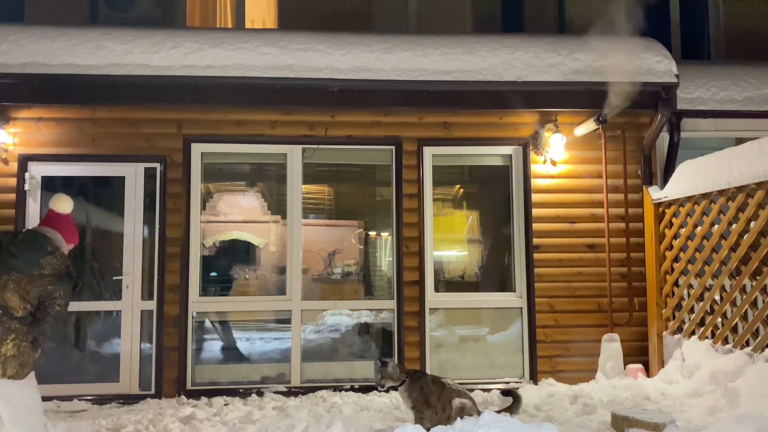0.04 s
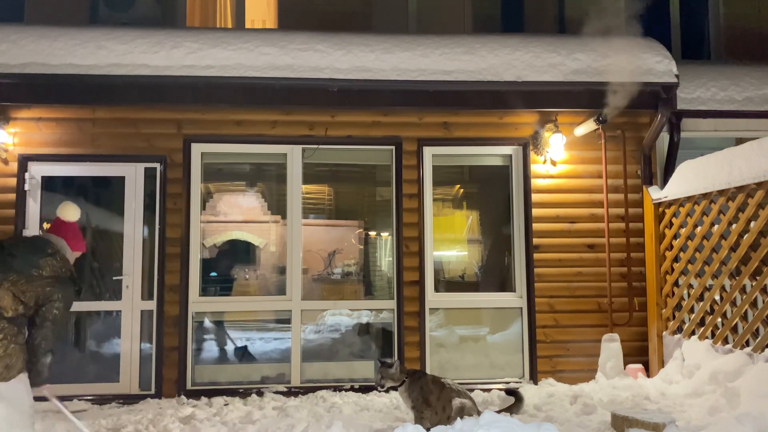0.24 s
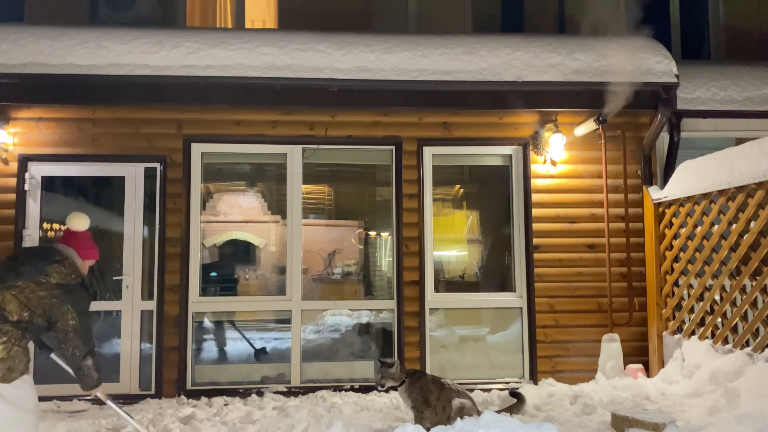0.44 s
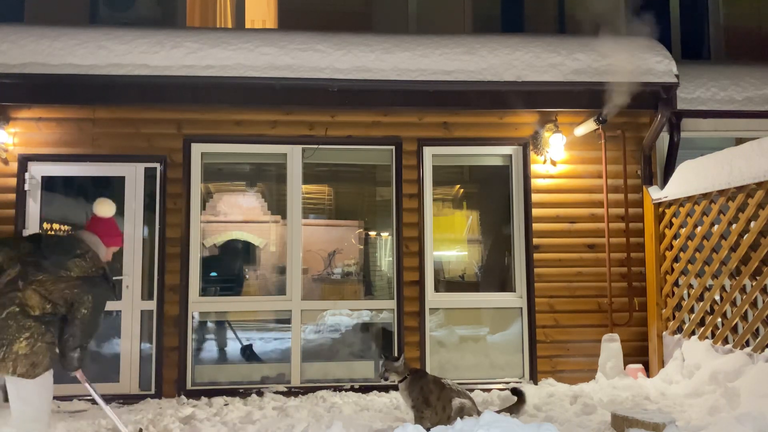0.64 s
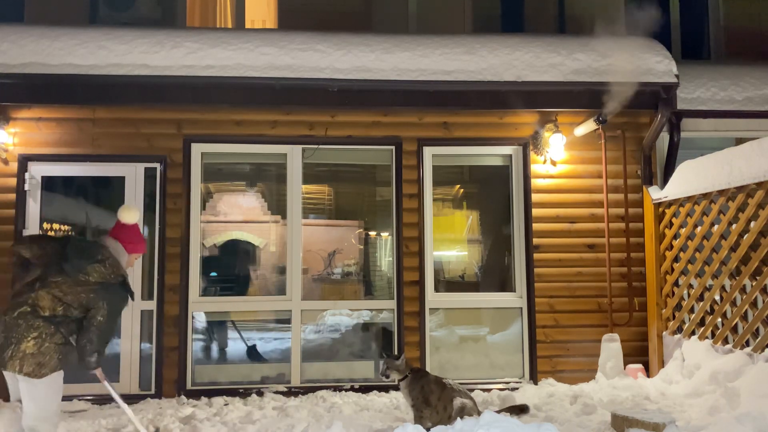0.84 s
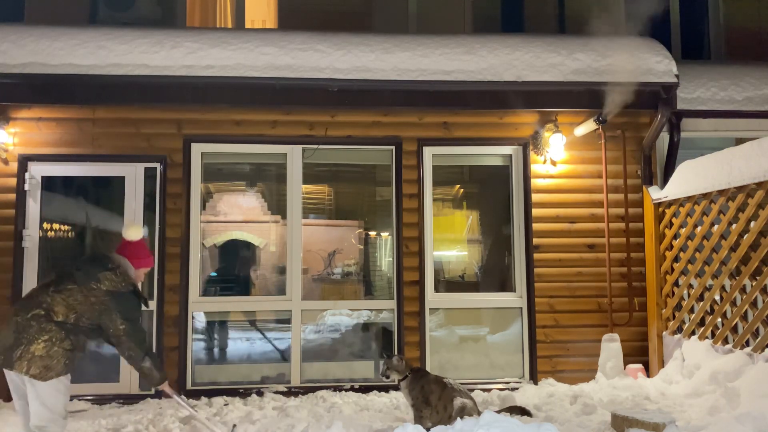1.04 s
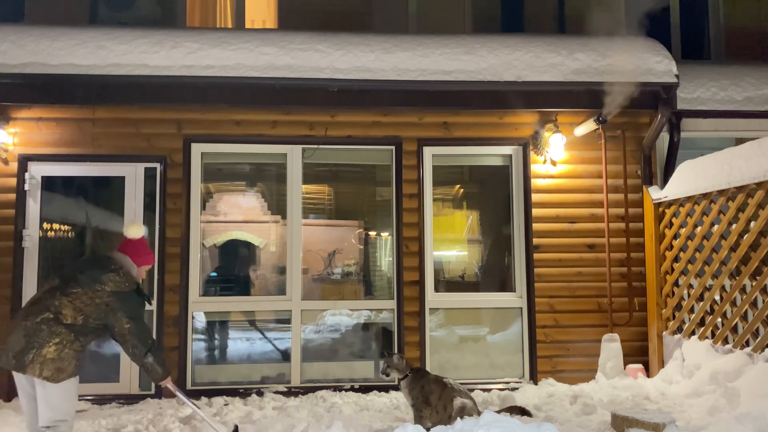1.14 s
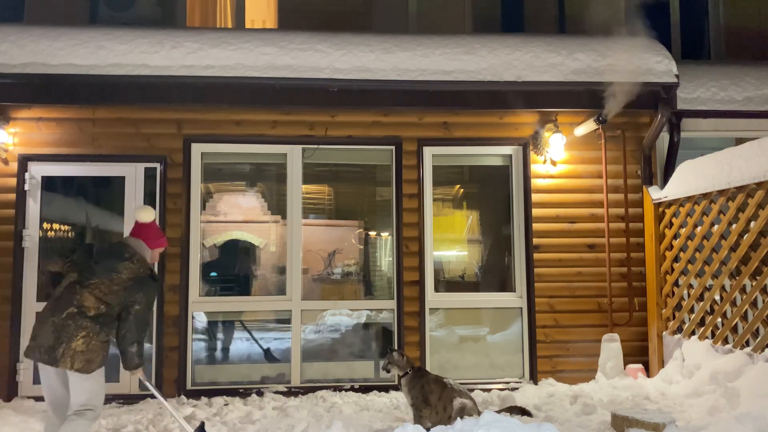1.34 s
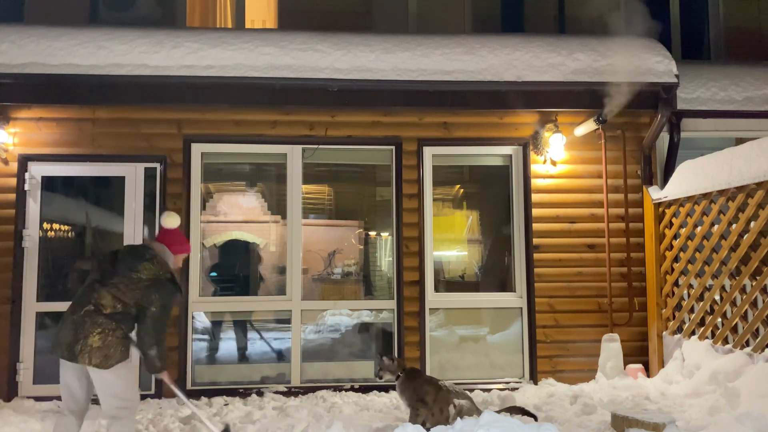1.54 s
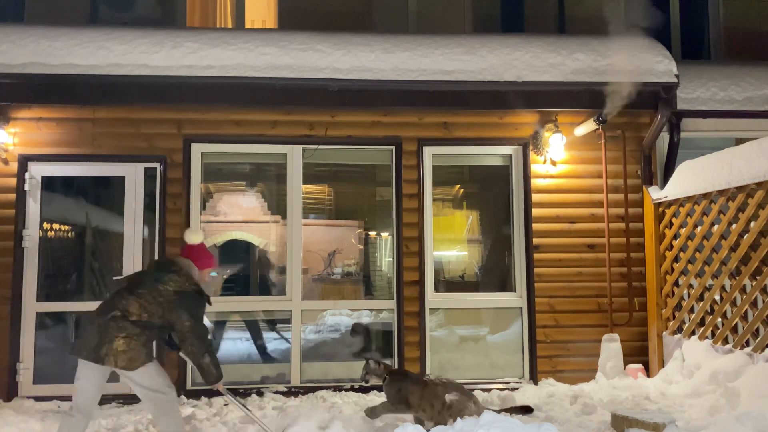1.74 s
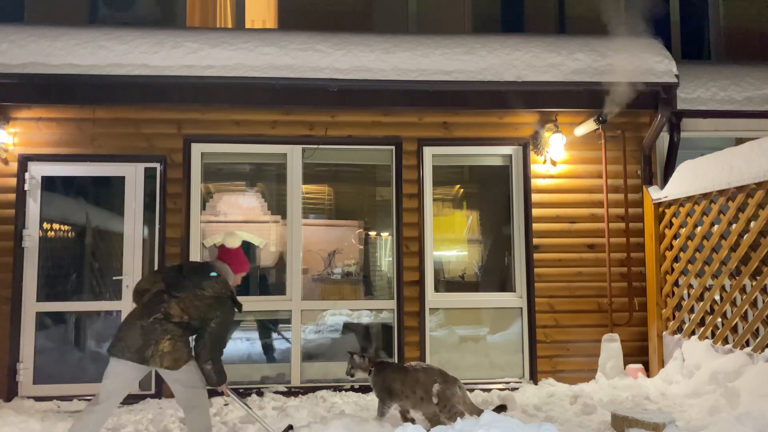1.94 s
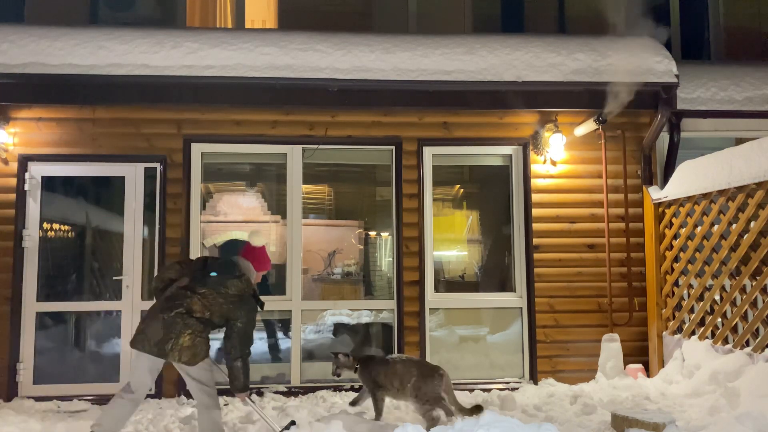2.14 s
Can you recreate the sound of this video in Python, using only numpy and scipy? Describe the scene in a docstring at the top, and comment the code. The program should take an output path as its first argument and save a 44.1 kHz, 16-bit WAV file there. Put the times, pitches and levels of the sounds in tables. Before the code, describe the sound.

Snow shovel scraping through packed snow in three rough, hissing strokes on a still night

```python
"""Three hissing scrapes of a shovel through packed snow on a still night, a few metres away by a wooden house.
Breaking grains are clumped random impulses, coloured into hiss, crunch and a drone through the blade's modes.
Lumps thud as short damped sines; catches of the edge are decaying noise bursts that ring the blade;
the scrape dips just before two of them. Two microphone ports hear the shovel with a lag, and wall and
snow banks answer with scattered, decaying noise. A faint noise floor is the night."""
import sys
import numpy as np
from scipy import signal
from scipy.fft import rfft, irfft, next_fast_len
from scipy.io import wavfile
from scipy.ndimage import map_coordinates

SR = 44100
rng = np.random.default_rng(int(sys.argv[2]) if len(sys.argv) > 2 else 0)


def master(y):
    """Save y as 16-bit WAV."""
    cut = np.clip(np.atleast_2d(y).T, -1, 1)
    pcm = np.round(cut * 32767)  # scale
    wavfile.write(sys.argv[1], SR, pcm.astype(np.int16))


N = 97020

# Modes of the blade: (frequency [Hz], relative level [dB], t60 [s])
BLADE_MODES = [(252, -6, 0.26), (344, 3, 0.057), (487, -4, 0.094), (656.3, -10, 0.16), (768.4, 2.5, 0.19),
               (888, 1.5, 0.2), (1005, 0, 0.23), (1089, -2, 0.13), (1513, -16, 0.068), (1947, -5, 0.094)]


def amp(db):
    """Level in decibels to amplitude ratio."""
    return 10 ** (np.asarray(db) / 20)


def unit(x):
    """Normalisation to unit root-mean-square."""
    return x / np.sqrt(np.mean(x ** 2) + 1e-20)


def along(points, hz, ends=None):
    """Interpolation of (frequency [Hz], value) points on a logarithmic frequency axis."""
    f, value = np.transpose(points)
    return np.interp(np.log(hz + 1), np.log(f + 1), value, ends, ends)


def wobble(rate):
    """Slow random modulation: a smooth curve through rate random knots a second."""
    knots = rng.standard_normal(int(N * rate / SR) + 4)
    return map_coordinates(knots, [np.arange(N) * rate / SR])


def filtered(x, response):
    """Linear filtering: the spectrum of x times a complex response of frequency."""
    m = next_fast_len(N + SR // 2)  # zero padding leaves room for the tails
    hz = np.fft.rfftfreq(m, 1 / SR)
    return irfft(rfft(x, m) * response(hz), m)[..., :N]


def coloured(x, spectrum):
    """Spectral shaping: x takes the given frequency response, then unit power."""
    return unit(filtered(x, lambda hz: amp(along(spectrum, hz, ends=-120))))


def grains(per_s, spread_db, clump_db, clumps_per_s):
    """Impulsive fracture noise: tiny breaks of uneven size whose strength swells in clumps."""
    chance = rng.random(N)
    sign_and_size, spread = rng.standard_normal((2, N))
    happens = np.clip((per_s / SR - chance) * 200, 0, 1)
    breaks = sign_and_size * amp(spread_db * spread) * happens
    return breaks * amp(clump_db * wobble(clumps_per_s))


def scrape():
    """Friction and fracture: each push drives grain hiss, blade drone and the crunch of packing snow."""
    # Course of the pushes: (time [s], grain hiss level before dips [dB], blade drone over it [dB],
    # low crunch over it [dB], finest hiss over it [dB])
    strokes = [(0.0, -66.5, 14, -13, -9), (0.021, -53.5, -12, -9, 3.5), (0.049, -46.5, -0.5, -7.5, -7),
               (0.142, -53.5, 3.5, -1, -5), (0.193, -38, -3, -2.5, -12), (0.214, -36.5, -0.5, -13, -5.5),
               (0.251, -27, -0.5, -3.5, -11.5), (0.282, -28.5, 3, -2, -11.5),
               (0.352, -38.5, 1.5, -8, -11.5), (0.477, -58, 4.5, 7, -5), (0.553, -48, -8.5, -2.5, -3),
               (0.733, -62, 9.5, 7.5, -7), (0.821, -39.5, -4.5, 2.5, -9), (0.888, -32.5, 1.5, -5.5, -10),
               (0.931, -35, 3, 0, -6), (0.957, -36, 1.5, -5.5, -9.5), (1.048, -43.5, 2, 3, -4),
               (1.083, -45.5, -6, -0.5, -7), (1.173, -63, 7, 11.5, -1.5), (1.305, -55.5, -3.5, 0, -2),
               (1.327, -55.5, 1.5, 3, -6), (1.399, -53.5, 0.5, -9.5, -8), (1.449, -63.5, 0, -6, -4.5),
               (1.486, -48.5, 0.5, -7.5, -8.5), (1.547, -32, 2.5, 1, -13), (1.564, -28.5, 2.5, -9.5, -12),
               (1.619, -35.5, 1.5, 1.5, -9.5), (1.717, -46, 1.5, -5, -6), (1.85, -63, 0, 3, -1),
               (1.949, -73, 4.5, 15, -1), (2.037, -60.5, -7, -3.5, -4.5), (2.18, -77, 6, 12, -3)]
    # Spectra of the four layers: (frequency [Hz], relative level per Hz [dB])
    hiss_spectrum = [(450, -14), (800, -1.5), (1400, -3), (2000, -5.5), (3200, -5.5), (4500, -10.5),
                     (5600, -17.5), (7500, -17.5), (9000, -67)]
    fine_spectrum = [(5500, -14), (7500, -10), (10500, 2), (12500, -4.5), (14500, -16), (15800, -15)]
    drone_spectrum = [(300, -36), (480, -1), (700, 3), (1000, -1), (1400, -4.5), (2200, -19)]
    crunch_spectrum = [(25, -42), (60, -31.5), (130, -6), (260, -1.5), (380, -2), (620, -10)]
    # The scrape dips briefly just before two of the catches
    dip_ends_s, dip_length_s, dip_db = [.2545, 1.5508], .014, -6

    t = np.arange(N) / SR
    s, *columns = np.transpose(strokes)
    push, drone, low, fine = [np.interp(t, s, column) for column in columns]
    crunch_db = low + push  # the crunch does not dip
    ahead = np.array(dip_ends_s)[:, None] - t
    dip = (ahead > 0) * np.clip(1 - ahead / dip_length_s, 0, 1)
    push = push + dip_db * dip.sum(axis=0)

    out = amp(push) * coloured(grains(6980, 2.5, 0.21, 90), hiss_spectrum)
    out += amp(push + fine) * coloured(grains(15100, 1.2, 1.0, 60.5), fine_spectrum)
    out += amp(push + drone) * rubbed(coloured(grains(3130, 2.94, 1, 43.94), drone_spectrum))
    out += amp(crunch_db) * coloured(grains(1400, 2, 2, 30), crunch_spectrum)
    return out


def rubbed(x):
    """Forced resonance: the scraping keeps the damped modes of the blade sounding."""
    ring_db = 3.5  # gain of each resonance at its centre, over the direct drone

    def modes(f):
        response = 1
        for centre, _, t60 in BLADE_MODES:
            width = np.log(1000) / np.pi / t60  # half-power bandwidth [Hz]
            damping = 1j * f * width
            response = response + amp(ring_db) * damping / (centre * centre - f * f + damping)
        return response
    return unit(filtered(x, modes))


def catches():
    """Impact excitation: a burst of breaking crust rings most the blade modes near its brightness."""
    # The edge catches on crust and hard ground: (time [s], burst peak before its onset ramp [dB],
    # brightness [Hz], burst t60 [s], blade ring [dB])
    catch_events = [(0.2019, -14, 690, 0.012, -41), (.263, -18, 990, 0.22, -18.5),
                    (.7, -36, 1160, 0.026, -55), (0.859, -44, 910, 0.044, -42),
                    (0.2542, -23, 1020, 0.048, -25), (0.2545, -21.5, 3130, 0.1, -38),
                    (1.5513, -11, 5800, 0.012, -36), (1.5592, -16, 6800, 0.0057, -42),
                    (1.5607, -9, 1870, .04, -31), (2.109, -57, 2630, 0.056, -76)]
    band_ratio, rise_s = 1.6, .0005  # band edges over and under the brightness; onset time constant
    out, t = np.zeros(N + SR), np.arange(SR // 4) / SR
    for s, db, hz, t60, ring_db in catch_events:
        band = signal.butter(2, [hz / band_ratio, hz * band_ratio], "band", fs=SR)
        burst = amp(-60 * t / t60) * signal.lfilter(*band, rng.standard_normal(len(t)))
        burst = burst * amp(db) / np.abs(burst).max()
        for f, level, decay in BLADE_MODES:
            near_db = -4.5 * abs(np.log2(f / hz))  # weaker by octaves away from the brightness
            mode_db = ring_db + level + near_db + rng.normal(0, 1.8)
            burst += amp(mode_db - 60 * t / decay) * np.sin(2 * np.pi * (f * t + rng.random()))
        out[round(s * SR):][:len(t)] += (1 - np.exp(-t / rise_s)) * burst
    return out[:N]


def thuds():
    """Heavily damped oscillation: each soft impact is a few cycles at its own pitch."""
    # Snow lumps and boots: (time [s], envelope peak level [dB], pitch [Hz])
    thud_events = [(0.043, -44.5, 136), (0.166, -40, 363), (0.198, -26.5, 411), (0.263, -18.5, 241),
                   (0.281, -18.5, 268), (0.704, -39, 220), (0.762, -35.5, 233), (0.793, -32.5, 229),
                   (0.811, -30.5, 148), (0.856, -24.5, 263), (0.914, -24, 328), (1.026, -40, 334),
                   (1.045, -36, 133), (1.163, -45, 178), (1.187, -40, 197), (1.215, -39.5, 184),
                   (1.283, -48, 173), (1.326, -42.5, 170), (1.555, -20, 366), (1.676, -37, 330),
                   (1.881, -39, 148), (1.909, -42.5, 111), (1.945, -49, 149), (2.147, -51.5, 348)]
    cycles = 3.2  # the envelope peaks after a quarter of these
    out, t = np.zeros(N + SR), np.arange(SR // 10) / SR
    for s, db, hz in thud_events:
        u = t * hz / cycles * 4
        envelope = u * np.exp(1 - u)
        out[round(s * SR):][:len(t)] += amp(db) * envelope * np.sin(2 * np.pi * hz * t)
    return out[:N]


def ports(x):
    """Phase and level differences: direct sound reaches two ports with its own lag and shading."""
    # Phase by which the left port leads: (frequency [Hz], phase [rad])
    left_lead = [(0, 0), (300, -.8), (520, -3.1), (900, -4.3), (1800, -2.2), (3200, -3.2), (5000, -.5),
                 (6600, 0), (8300, -3.14), (11000, -6.28), (13500, -9.42), (15400, -12.57)]
    # Shading between the ports: (frequency [Hz], left over right [dB])
    left_over_right = [(60, -1), (400, -6.5), (900, -3), (2000, -8.5), (4000, 6.5), (6400, -1), (15000, 1)]

    def pair(hz):
        phase = np.interp(hz, *np.transpose(left_lead))
        half = amp(along(left_over_right, hz) / 2) * np.exp(.5j * phase)
        return np.array([half, 1 / half])  # each port takes half of the difference
    return filtered(x, pair)


def wall(x):
    """Diffuse reflection: each short stretch gets a new random tail, which keeps the two ports' answers diffuse."""
    # Strength of the answer of wall and snow banks: (frequency [Hz], wall over direct [dB])
    wall_over_direct = [(40, -6), (220, -9), (430, -1), (700, -6), (1400, 1), (6000, 1), (8300, -11)]
    # Decay of the answer: (frequency [Hz], t60 [s])
    wall_decay = [(200, .07), (2000, .035), (10000, .03)]
    out, step = np.zeros((2, N + SR)), SR // 40
    delay = 100  # samples before the answer begins
    x = filtered(x, lambda hz: amp(along(wall_over_direct, hz)))
    x = np.pad(x, (0, 2 * step))
    fade = signal.windows.hann(2 * step, sym=False) ** .5  # overlapping stretches keep constant power
    for a in range(0, N, step):
        hz, t, z = signal.stft(rng.standard_normal((2, SR // 10)), SR, nperseg=128)
        t60 = along(wall_decay, hz)[:, None]
        decaying = z * amp(-60 * t / t60) / np.sqrt(t60)
        tail = signal.istft(decaying, SR, nperseg=128)[1]
        tail = tail / np.linalg.norm(tail, axis=1, keepdims=True)
        wet = signal.fftconvolve(fade * x[None, a:a + 2 * step], tail, axes=1)
        out[:, a + delay:][:, :wet.shape[1]] += wet
    return out[:, :N]


def night():
    """Stationary background noise: Gaussian noise of fixed spectrum and level."""
    # Spectrum of the still night: (frequency [Hz], relative level per Hz [dB])
    night_spectrum = [(20, -32), (60, 11), (150, -13), (400, -4.5), (2000, -13), (8000, -31.5),
                      (15000, -36)]
    return amp(-63) * coloured(rng.standard_normal(N), night_spectrum)


def scene():
    """Superposition of direct and diffuse fields; the night passes through both with the shovel."""
    steady = scrape() + night()
    hits = thuds() + catches()
    hits_wall_db = -4  # hits come from one spot and keep more of their direct sound
    return ports(steady + hits) + wall(steady + amp(hits_wall_db) * hits)


def record(dry):
    """Band limitation: nothing passes at or above the upper limit."""
    top_hz = 15850
    return filtered(dry, lambda hz: hz < top_hz)


dry = scene()
out = record(dry)
master(out)
```